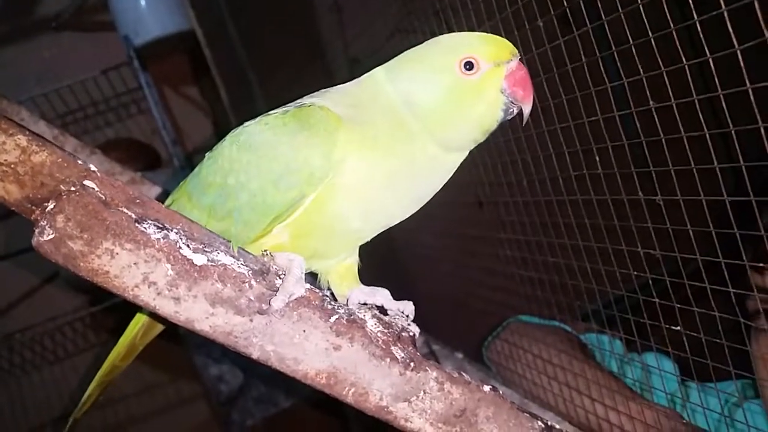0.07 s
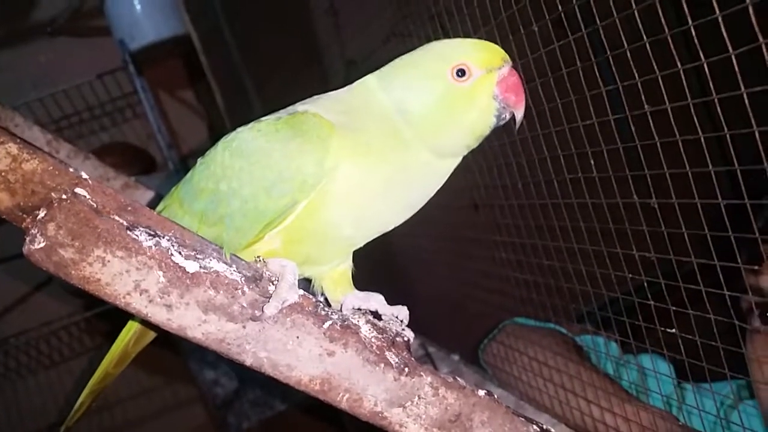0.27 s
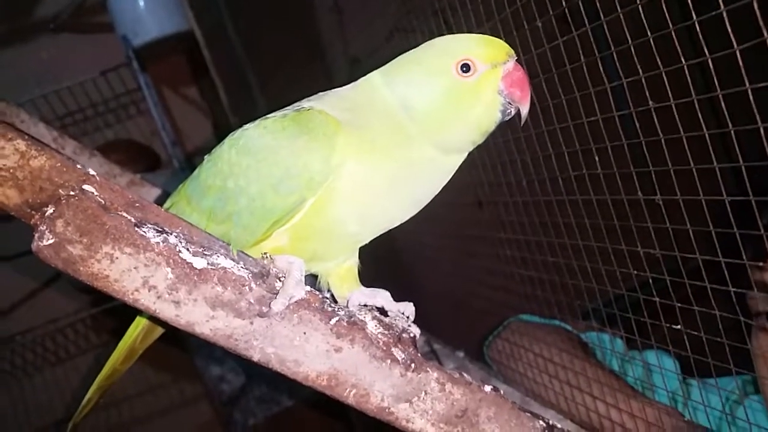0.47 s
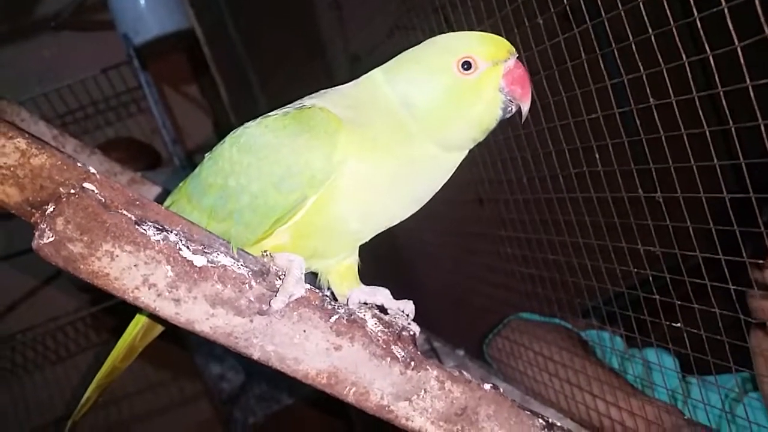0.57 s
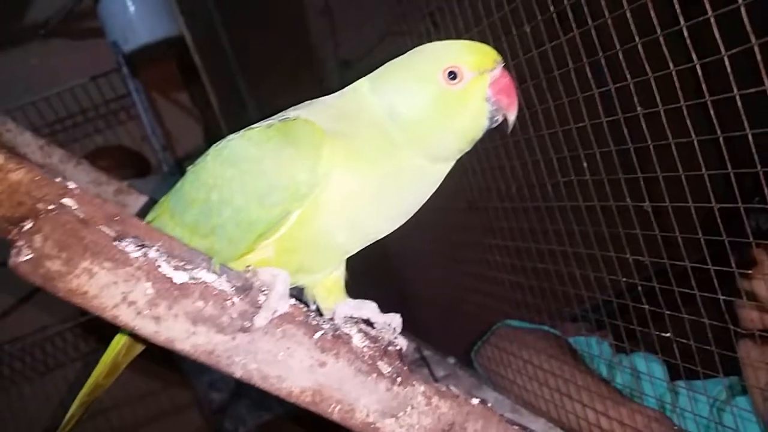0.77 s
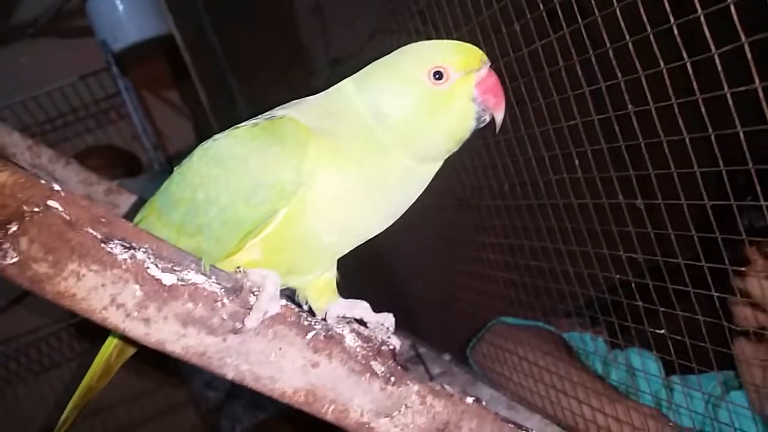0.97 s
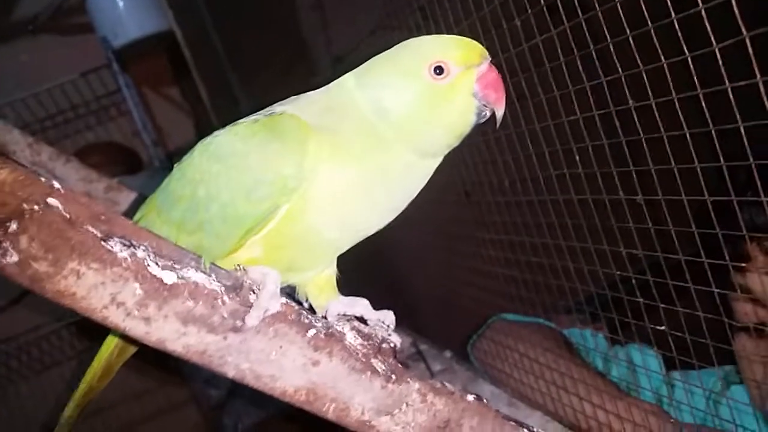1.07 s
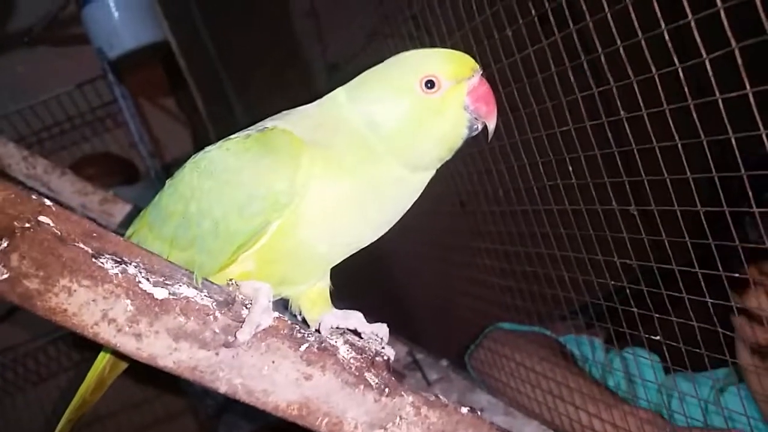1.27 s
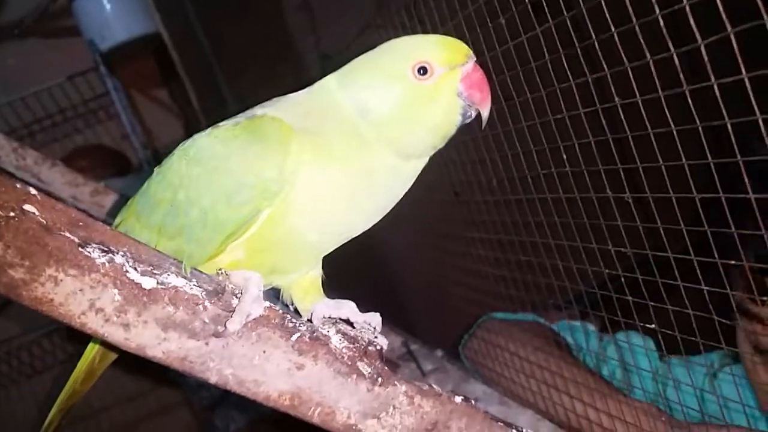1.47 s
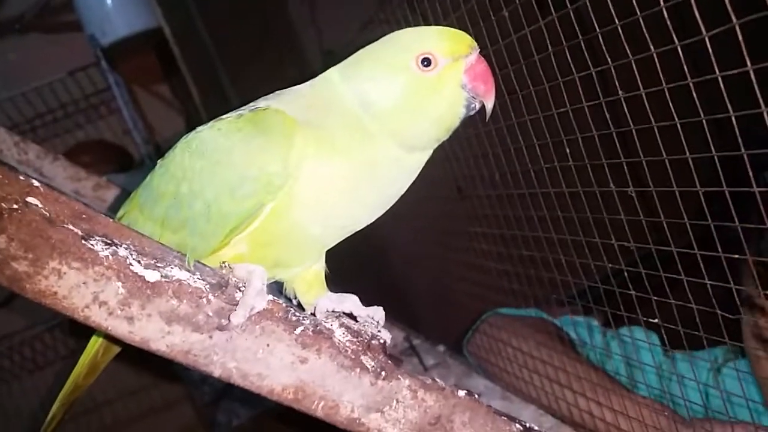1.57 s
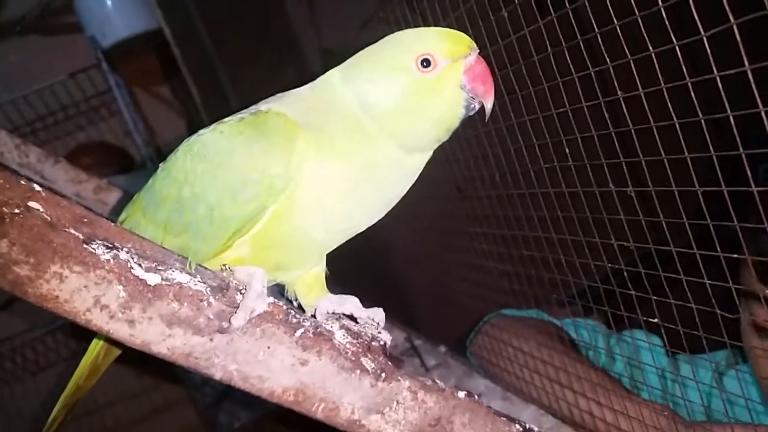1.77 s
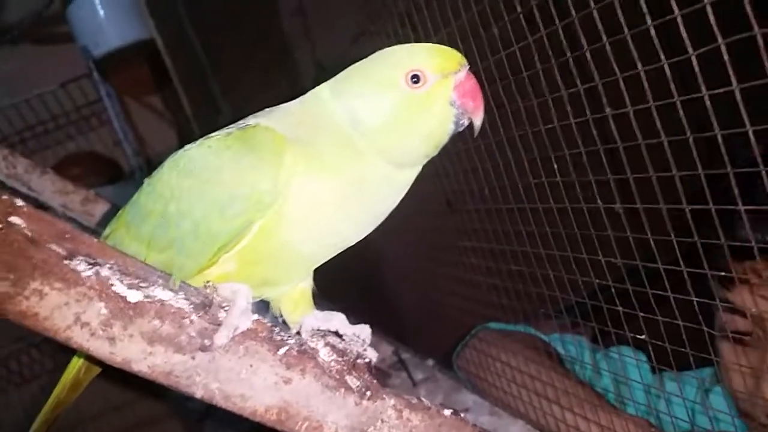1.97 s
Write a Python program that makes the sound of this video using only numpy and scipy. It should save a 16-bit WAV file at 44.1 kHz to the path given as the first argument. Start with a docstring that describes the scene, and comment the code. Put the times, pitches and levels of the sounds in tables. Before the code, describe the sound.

A parakeet gives one short nasal call at the very end, after dull knocks and faint peeps

```python
"""In a small room, a parakeet on a perch close to the microphone gives one short nasal call near the end:
a thin wheezy lead-in, a clean note and a rasping end, built from a pitch curve, overtones and noise.
Before it come faint peeps, a tiny squeak and a light click; two dull knocks boom before it, one during it.
A low rumble and a steady high whine, both shaped noise, lie underneath, and a low hum swells up once."""
import sys
import numpy as np
from scipy import signal
from scipy.fft import rfft, irfft
from scipy.io import wavfile

SR = 44100
rng = np.random.default_rng(int(sys.argv[2]) if len(sys.argv) > 2 else 0)


def materialize(psi):
    """Save the field psi as 16-bit PCM at rate SR to the path in sys.argv[1].

    A 1-D psi becomes a single channel; in a 2-D psi each row is a channel.
    """
    bounded = np.clip(np.atleast_2d(psi).T, -1, 1)
    quanta = np.round(bounded * 32767).astype(np.int16)
    wavfile.write(sys.argv[1], SR, quanta)


N = 88508
T = np.arange(N) / SR  # the time of every sample [s]

# unsteady pitch of the small bird sounds: typical share of the pitch, and how fast it wavers [Hz]
PEEP_JITTER, PEEP_JITTER_HZ = 0.03, 280


def amp(db):
    """Turns decibels into gain."""
    return 10 ** (np.asarray(db) / 20)


def unit(x):
    """Scales a sound to an average (rms) level of 1."""
    return x / np.sqrt(np.mean(x ** 2) + 1e-20)


def read(points, hz):
    """Looks up a table between its points, on a log-frequency axis."""
    f, value = np.transpose(points)
    return np.interp(np.log(hz + 1), np.log(f + 1), value)


def curves(rows):
    """Turns each column of a timed table into a curve, sample by sample."""
    s, *columns = np.transpose(rows)
    return [np.interp(T, s, column) for column in columns]


def pan(db):
    """Gives left and right gains for a level difference, left minus right."""
    return amp(np.array([[0.5], [-0.5]]) * db)


def bump(s, width):
    """A smooth swell and fall around one moment."""
    return np.exp(-((T - s) / width) ** 2)


def blend(a, b, same):
    """Makes a left and a right side that are alike by a share: 0 is unrelated, 1 is equal."""
    same = np.clip(same, -1, 1)
    return np.array([a, same * a + np.sqrt(1 - same ** 2) * b])


def noise(spectrum, same=0):
    """Random hiss in two channels, coloured by making some frequencies stronger than others."""
    gain = amp(read(spectrum, np.fft.rfftfreq(N, 1 / SR)))
    a, b = irfft(rfft(rng.standard_normal((2, N))) * gain, N)
    return unit(blend(a, b, same))


def wander(hz):
    """Random motion that is smooth because rates well above the given one are removed."""
    smooth = np.exp(-(np.fft.rfftfreq(N, 1 / SR) / hz) ** 2)
    return unit(irfft(rfft(rng.standard_normal(N)) * smooth, N))


def phase(hz):
    """Adds up a pitch curve into the running angle of a wave."""
    return 2 * np.pi * np.cumsum(hz) / SR


def ring(start, modes):
    """Several tones set off at one moment, each dying by 60 dB in its own time."""
    t = np.maximum(T - start, 0)
    out = np.zeros(N)
    for hz, db, t60 in modes:
        out += amp(db) * np.exp(-np.log(1000) * t / t60) * np.sin(2 * np.pi * hz * t)
    return out


def room(x):
    """The blurred echo of a small room: a sound is smeared by dying noise whose treble fades fastest."""
    # time to die by 60 dB: (frequency [Hz], time [s])
    room_t60 = [(100, 0.29), (1000, 0.45), (4000, 0.081), (12000, 0.029)]
    hz, t, z = signal.stft(rng.standard_normal((2, SR // 2)), SR, nperseg=256)
    decay = np.exp(-np.log(1000) * t / read(room_t60, hz)[:, None])
    tail = signal.istft(z * decay, SR, nperseg=256)[1]
    tail = tail + 0.043 * tail[::-1]  # a little of each side in the other
    return signal.fftconvolve(np.atleast_2d(x), tail / np.linalg.norm(tail[0]), axes=1)[:, :N]


def placed(x, sides):
    """Gives two unrelated noises their likeness and left-right balance, frequency by frequency."""
    hz = np.fft.rfftfreq(N, 1 / SR)
    same = read([row[:2] for row in sides], hz)
    balance_db = read([row[::2] for row in sides], hz)
    a, b = rfft(x)
    return unit(irfft(blend(a, b, same) * pan(balance_db), N))


def background():
    """A low rumble that slowly heaves and a steady whine, both made by colouring random noise."""
    # colour of the rumble: (frequency [Hz], relative level per Hz [dB])
    rumble_colour = [(20, -14.5), (50, -5.5), (90, -4), (135, 2), (250, -6), (400, -9.5), (600, -14.5),
                     (1100, -20.5), (1600, -27.5), (2800, -41.5), (5000, -48), (9000, -67)]
    # heaving of the rumble: (time [s], level [dB])
    rumble_level = [(0, -45.5), (.35, -49), (.55, -45.5), (.8, -47), (1.15, -46.5), (1.42, -49),
                    (1.65, -45.5), (2, -46)]
    # colour of the whine, bands of hiss: (frequency [Hz], relative level per Hz [dB])
    whine_colour = [(2500, -37), (3150, -14), (3500, 4.5), (4200, 4.5), (4750, -4), (5300, -32),
                    (5700, -13.5), (6250, -9), (6600, -59.5), (8500, -42.5), (10500, -29), (12500, -17.5),
                    (15800, -11.5)]
    # how the two sides compare: (frequency [Hz], likeness [0-1], left minus right [dB])
    rumble_sides = [(54.5, 0.57, -5), (205, 0.89, -3), (452, 0.65, 0.5), (885, 0.019, 0.5)]
    whine_sides = [(4150, 0.0034, 9), (11830, 0.0017, 2.4)]
    whine_db = -61.5

    level_db = curves(rumble_level)[0] + wander(25.0)
    rumble = amp(level_db) * placed(noise(rumble_colour), rumble_sides)
    return rumble + amp(whine_db) * placed(noise(whine_colour), whine_sides)


def peeps():
    """Faint unsteady whistles that swell and fade while their pitch glides up a little."""
    # (start [s], length [s], first pitch [Hz], last pitch [Hz], level [dB])
    peep_rows = [(0.036, .15, 1156, 1178, -58), (0.283, 0.09, 1114, 1120, -57.5),
                 (0.716, 0.043, 2450, 2480, -68), (0.752, 0.027, 2790, 2860, -69),
                 (0.789, 0.051, 2225, 2390, -67)]
    out = np.zeros(N)
    for start, length, first_hz, last_hz, db in peep_rows:
        progress = np.clip((T - start) / length, 0, 1)
        hz = first_hz + (last_hz - first_hz) * progress
        unsteady_hz = hz * (1 + PEEP_JITTER * wander(PEEP_JITTER_HZ))
        out += amp(db) * np.sin(np.pi * progress) * np.sin(phase(unsteady_hz))
    return np.sqrt(2) * out


def squeak():
    """A tiny scratchy squeak with an unsteady, sagging pitch, whose even harmonics swell once more."""
    # harmonics 1 and up: level [dB]
    harmonic_db = [-56, -61, -54.5, -73, -85, -92]
    squeak_s, linger_s, width_s = 0.342, 0.37, 0.007
    pitch_hz, sag_per_s = 1610, 0.8  # the pitch sags at this rate, as a share of itself
    jitter = 0.027  # typical share of the pitch

    hz = pitch_hz * np.exp(-sag_per_s * (T - squeak_s))
    turn = phase(hz * (1 + jitter * wander(PEEP_JITTER_HZ)))
    scratch = bump(squeak_s, width_s)
    linger = bump(linger_s, 2 * width_s)
    out = np.zeros(N)
    for k, db in enumerate(harmonic_db, 1):
        swell = scratch + linger * (k % 2 == 0)
        out += amp(db) * swell * np.sin(k * turn)
    return out


def click():
    """One light woody click: a few dying tones whose loudness chatters, and their echo in the room."""
    # tones of the click: (frequency [Hz], relative level [dB], time to die by 60 dB [s])
    click_modes = [(232, -9, 0.2), (339, -5, 0.17), (620, 5, 0.012), (770, 2.5, 0.015), (963, 6, 0.02),
                   (2290, -11.5, 0.03)]
    click_s, rise_s = 0.4107, 0.00025
    click_db, echo_db, pan_db = -37.5, -6, -7.5

    attack = np.clip((T - click_s) / rise_s, 0, 1)
    chatter = 1 + 0.3 * wander(250)
    click_dry = amp(click_db) * attack * chatter * ring(click_s, click_modes) * pan(pan_db)
    return click_dry + amp(echo_db) * room(click_dry)


def drone():
    """A low wavering hum, mostly on the right, swells briefly out of the rumble."""
    swell = amp(-50.5) * bump(0.767, 0.1)
    hz = 88 * (1 + 0.04 * wander(25))
    return np.sqrt(2) * swell * np.sin(phase(hz)) * pan(-19.5)


def knocks():
    """Each knock is one low push with a noisy tick on top, then a boom of low tones and an echo."""
    # (time [s], level [dB], push length [s], tick level [dB], tick brightness [dB per octave])
    knock_rows = [(0.9369, -17.5, 0.0012, -31, -0.5), (1.5005, -18.5, 0.00094, -38.5, -2),
                  (1.9105, -15, 0.00085, -29, -2.5)]
    # colour of the tick before its brightness is added: (frequency [Hz], relative level [dB])
    tick = [(300, -7.5), (1050, 13), (1500, 1.5), (2500, -3), (4500, -12), (7000, -25), (9300, -44),
            (11500, -20.5)]
    # tones of the boom: (frequency [Hz], level relative to the knock [dB], time to die by 60 dB [s])
    boom_modes = [(125, -28, 0.53), (176.6, -10.5, 0.24), (230.6, -15, 0.36), (357.2, -23.5, 0.28)]
    tick_rise_s, tick_decay_s = 0.0004, 0.003
    boom_delay_s, boom_rise_s = 0.005, 0.014
    knock_pan_db, boom_pan_db, echo_db = -7.5, -1.5, -12.5

    push, boom = np.zeros((2, N)), np.zeros(N)
    for s, db, length, tick_db, tilt_db in knock_rows:
        u = (T - s) / length
        push += amp(db) * (u ** 2 - 1) * np.exp(-0.5 * u ** 2)
        colour = [(hz, level + tilt_db * np.log2(hz)) for hz, level in tick]
        age = np.maximum(T - s + 2 * length, 0)  # the tick starts just ahead of the push's peak
        tick_shape = np.minimum(age / tick_rise_s, 1) * np.exp(-age / tick_decay_s)
        push += amp(tick_db) * tick_shape * noise(colour, 0.17)
        swell = np.clip((T - s - boom_delay_s) / boom_rise_s, 0, 1)
        boom += amp(db) * swell * ring(s + boom_delay_s, boom_modes)
    push = push * pan(knock_pan_db)
    return push + boom * pan(boom_pan_db) + amp(echo_db) * room(push)


def lead_in():
    """The bird's throat wheezes with soft noise, then whistles just before the note catches."""
    # thin whistle: (time [s], pitch [Hz], level [dB])
    whistle_rows = [(1.75, 1300, -58.5), (1.785, 1349, -52.5), (1.815, 1636, -51), (1.845, 1600, -51),
                    (1.852, 1603, -35), (1.873, 1540, -63)]
    # colour of the wheeze: (frequency [Hz], relative level [dB])
    wheeze_colour = [(500, -3.5), (1300, 7.5), (1900, 3), (2600, -7), (6000, -43)]
    wheeze_s, wheeze_width_s, wheeze_db = 1.76, 0.038, -51.5

    hz, db = curves(whistle_rows)
    on = (T > whistle_rows[0][0]) & (T < whistle_rows[-1][0])
    turn = phase(hz * (1 + PEEP_JITTER * wander(PEEP_JITTER_HZ)))
    ahead = np.array([[0], [1.3]])  # the right side runs ahead [radians]
    whistle = np.sqrt(2) * on * amp(db) * np.sin(turn + ahead)
    wheeze = amp(wheeze_db) * bump(wheeze_s, wheeze_width_s) * noise(wheeze_colour)
    return whistle + wheeze


def call():
    """A strong clean fundamental with nasal overtones that swell and break one by one; it rasps as it fades."""
    # (time [s], pitch [Hz], level [dB], overtone level [dB], left minus right [dB], roughness [0-1])
    call_rows = [(1.852, 785, -53, -52, -11, 0), (1.861, 787.6, -27, -46.5, -2.5, 0.07),
                 (1.884, 785, -24, -45, 2.5, 0), (1.9, 786.5, -19.5, -42, 2, 0.11),
                 (1.919, 787.2, -13.5, -41.5, 0, 0.1), (1.943, 796, -14, -46, 5.5, 0.07),
                 (1.98, 805.4, -17.5, -40.5, -6, 0.02), (1.997, 811, -26.5, -42.5, -10, 0.56),
                 (2.005, 848, -28.5, -43, -7, 0.7)]
    # overtones 2 and up: (relative level [dB], left minus right [dB], lead of the left [radians],
    # swell time [s], swell height [dB], break time [s])
    overtones = [(-2.5, 6, -2, 2.0, 8.5, 1.897), (-1, 6, -2, 1.925, 10.5, 1.924),
                 (-0.5, 4.5, 2, 1.955, 12.5, 1.912), (-16.5, -6.5, -4, 1.953, 15.5, 1.934),
                 (-24.5, -6.5, 0.5, 1.975, -0.5, 1.94)]
    # colour of the rasp: (frequency [Hz], relative level [dB])
    rasp_colour = [(300, -27.5), (800, 0), (1200, 2.5), (1700, 2), (2100, -10.5), (2850, -18), (3350, 2),
                   (4200, -15), (6000, -40.5), (14000, -32.5)]
    lead_start, lead_end = -0.71, -1.9  # fundamental's lead of the left as the head turns [radians]
    jitter, jitter_hz = 0.05, 184  # unsteady pitch at full roughness: share and rate
    shimmer, flutter_hz = 0.85, 150  # unsteady loudness at full roughness: share and rate
    swell_width_s, break_width_s, break_db = 0.031, 0.005, -10
    rise_s = 0.0072  # times the harmonic number: the higher ones build up later
    pan_drift_db_per_s, stray_rad, stray_hz = -55.5, 0.28, 50.3

    hz, level_db, over_db, pan_db, rough = curves(call_rows)
    start, end = call_rows[0][0], call_rows[-1][0]
    age = np.maximum(T - start, 0)
    sides = np.array([[0.5], [-0.5]])
    turn = phase(hz * (1 + jitter * rough * wander(jitter_hz)))
    lead = lead_start + (lead_end - lead_start) * (age / (end - start)) ** 2
    flutter = 1 + shimmer * rough * wander(flutter_hz)
    out = amp(level_db) * pan(pan_db) * np.cos(turn + sides * lead) * flutter

    drift_db = pan_drift_db_per_s * (age - (end - start) / 2)
    for k, (db, side_db, ahead, swell_s, swell_db, break_s) in enumerate(overtones, 2):
        lift_db = swell_db * bump(swell_s, swell_width_s) + break_db * bump(break_s, break_width_s)
        stray = np.array([wander(stray_hz) for _ in sides])  # each side's phase strays by itself
        rise = np.clip(age / (k * rise_s), 0, 1)
        gain = amp(over_db + db + lift_db) * pan(side_db + drift_db) * rise
        out += gain * np.cos(k * turn + sides * ahead + stray_rad * stray)

    pulse = 1 + np.cos(turn)  # the rasp pulses once per cycle of the note
    out += amp(over_db - 2.5) * np.sqrt(abs(rough)) * noise(rasp_colour) * pulse
    fade = np.clip(np.minimum(T - start, T[-1] - T) / 0.00091, 0, 1)
    return np.sqrt(2) * out * fade


def scene():
    """Adds the bird and its faint echo to the knocks, click, hum and background."""
    bird = call() + lead_in() + peeps() + squeak()
    echo = amp(-26) * room(bird)
    return bird + echo + knocks() + click() + background() + drone()


def record(dry):
    """The recorder's band limit: a steep filter removes the highest treble."""
    edge_hz = 15900
    band_limit = signal.firwin(511, edge_hz, window=("kaiser", 9), fs=SR)
    return signal.oaconvolve(dry, band_limit[None], "same")


dry = scene()
out = record(dry)
materialize(out)
```